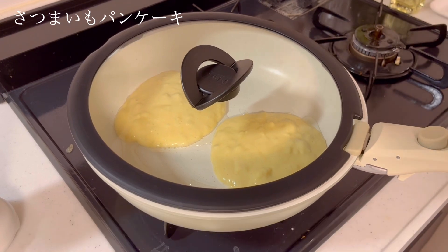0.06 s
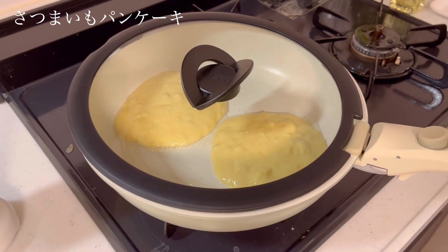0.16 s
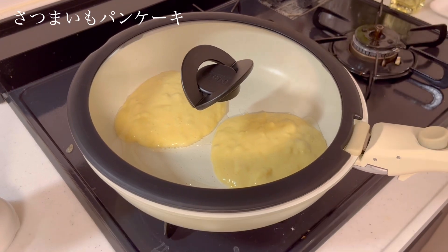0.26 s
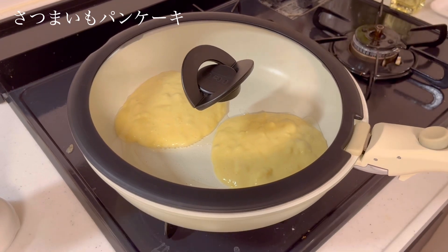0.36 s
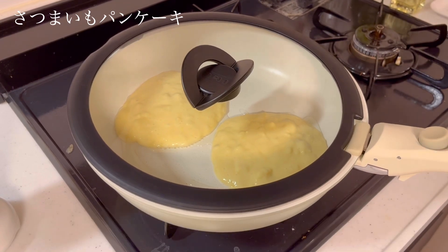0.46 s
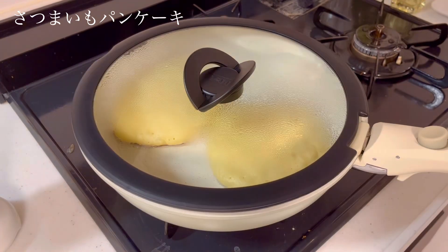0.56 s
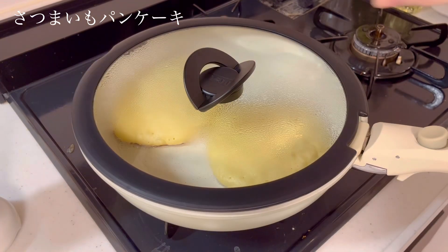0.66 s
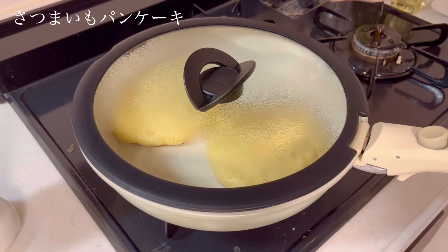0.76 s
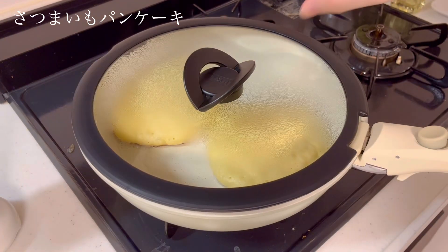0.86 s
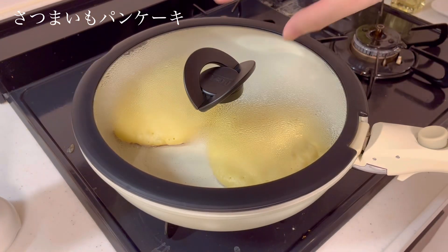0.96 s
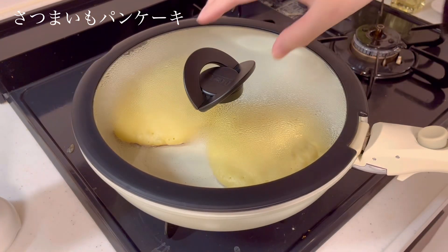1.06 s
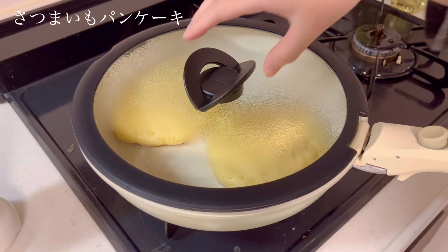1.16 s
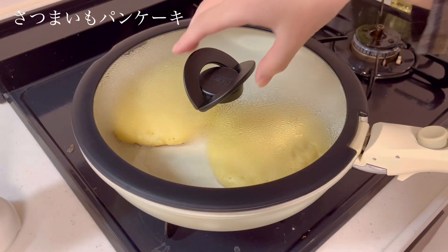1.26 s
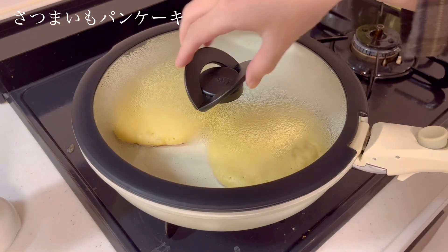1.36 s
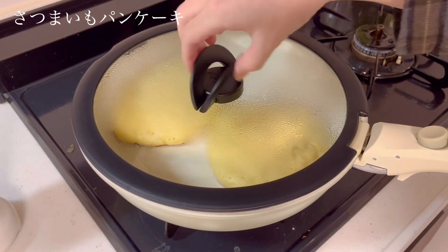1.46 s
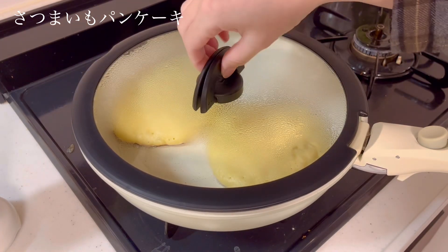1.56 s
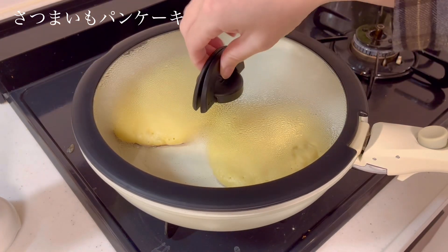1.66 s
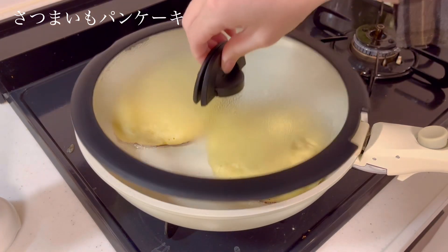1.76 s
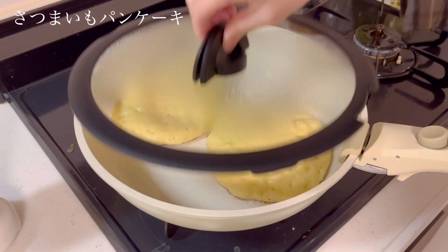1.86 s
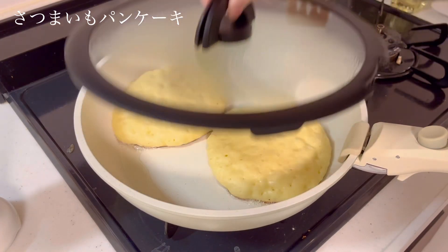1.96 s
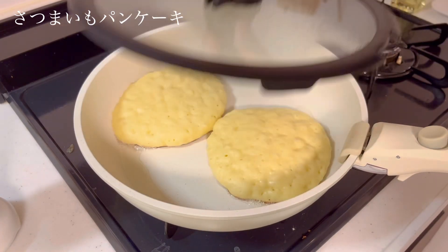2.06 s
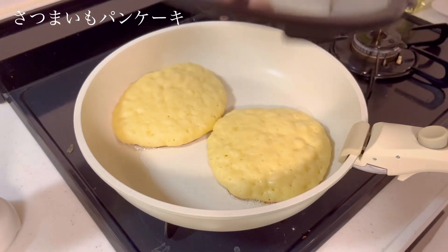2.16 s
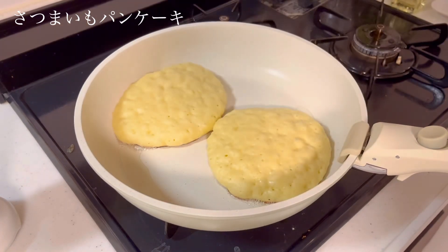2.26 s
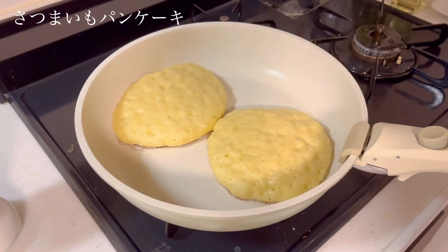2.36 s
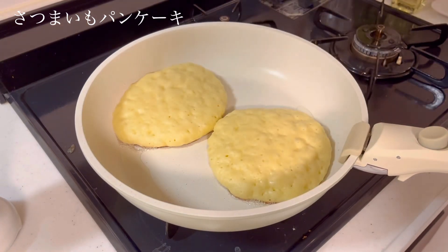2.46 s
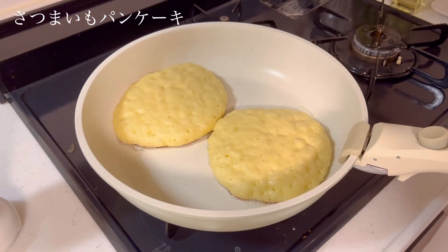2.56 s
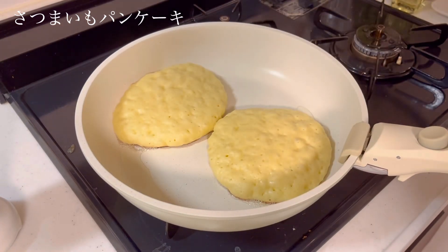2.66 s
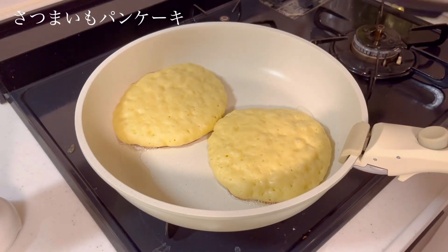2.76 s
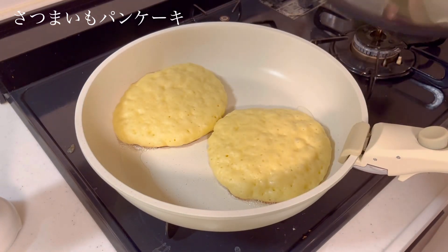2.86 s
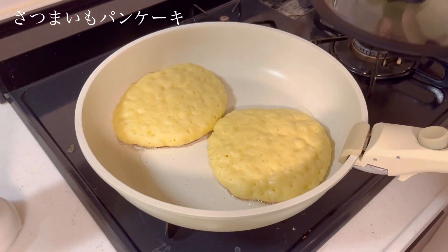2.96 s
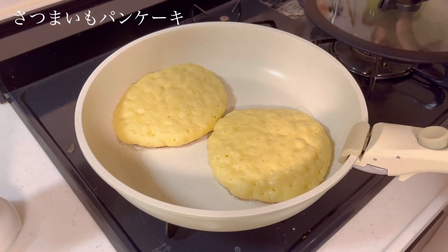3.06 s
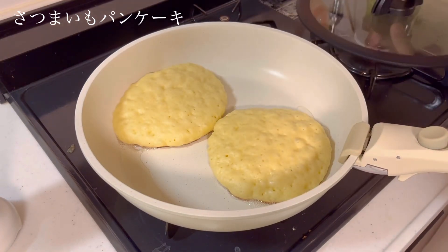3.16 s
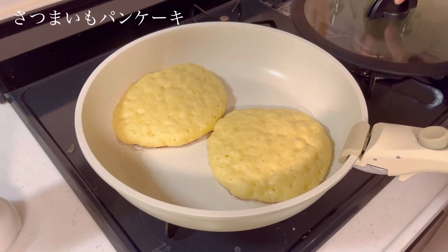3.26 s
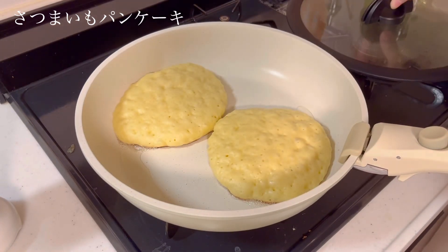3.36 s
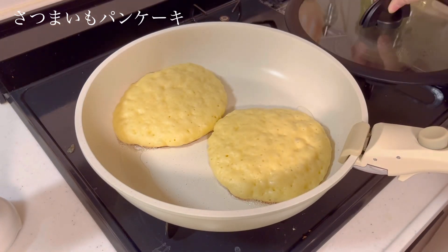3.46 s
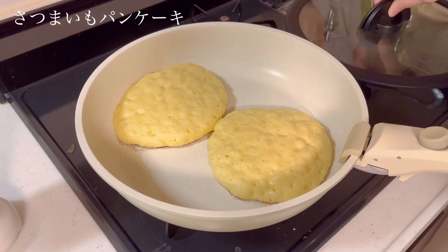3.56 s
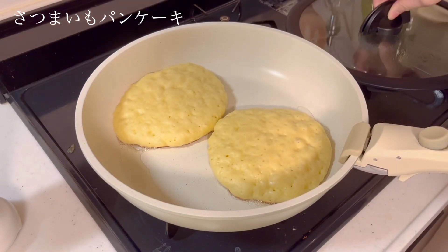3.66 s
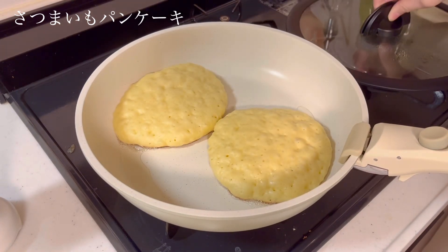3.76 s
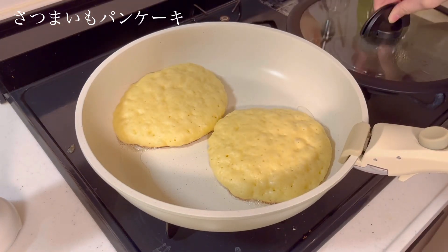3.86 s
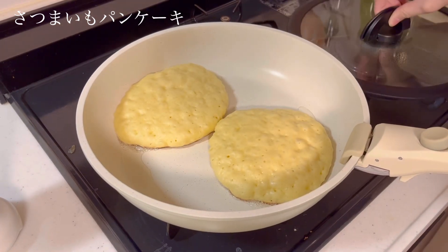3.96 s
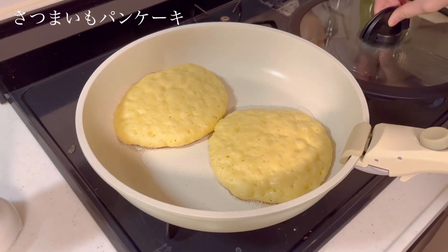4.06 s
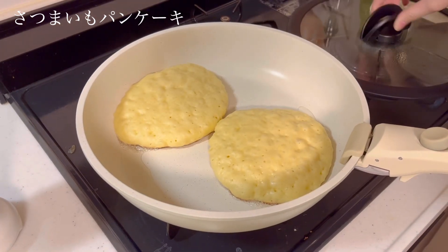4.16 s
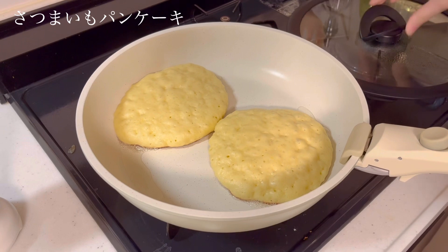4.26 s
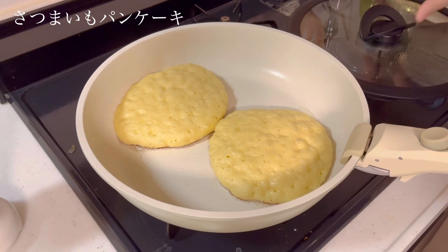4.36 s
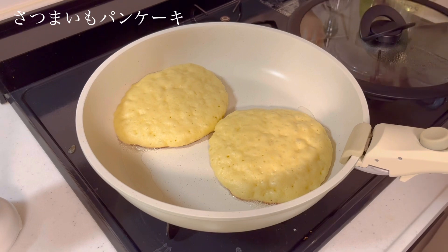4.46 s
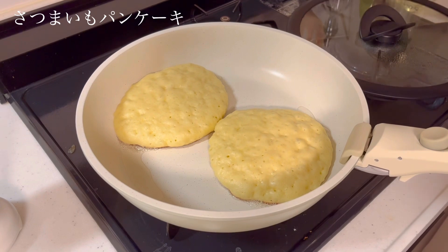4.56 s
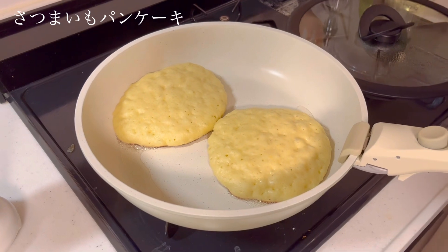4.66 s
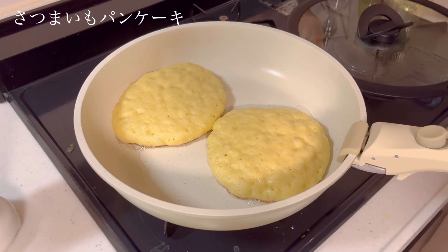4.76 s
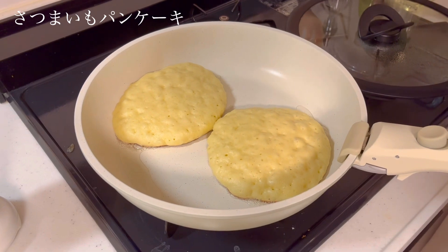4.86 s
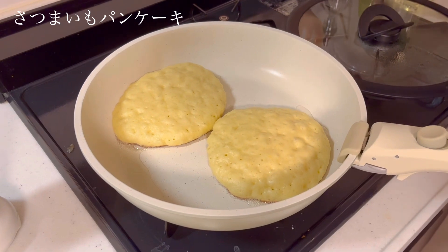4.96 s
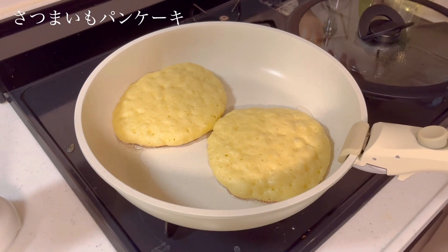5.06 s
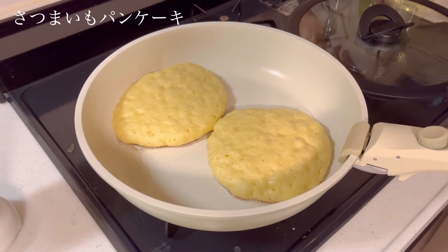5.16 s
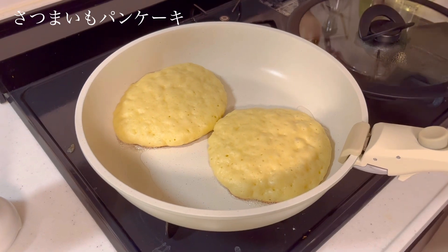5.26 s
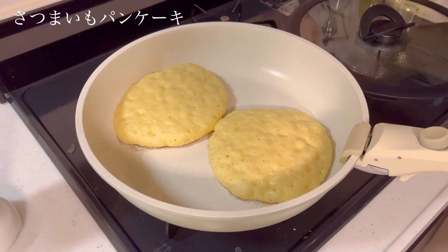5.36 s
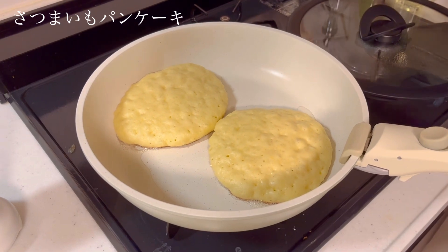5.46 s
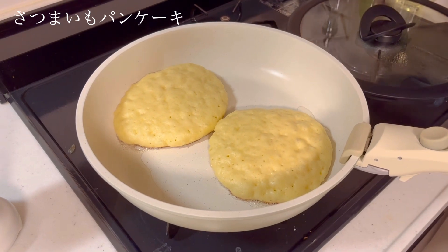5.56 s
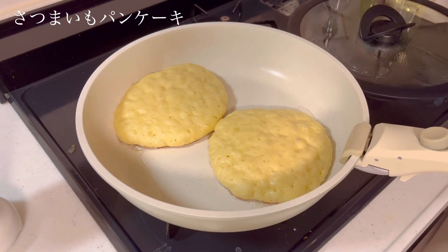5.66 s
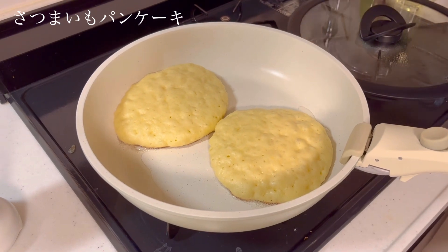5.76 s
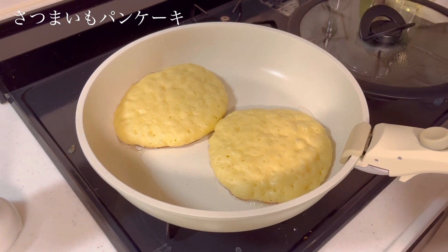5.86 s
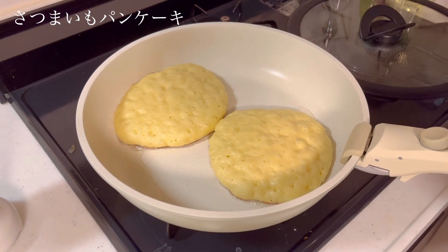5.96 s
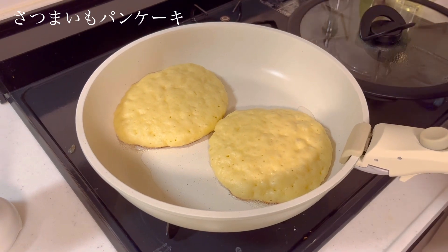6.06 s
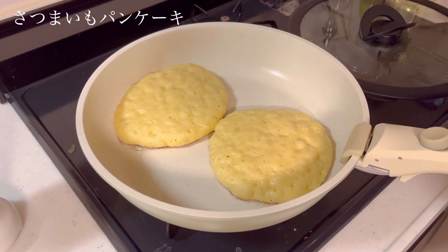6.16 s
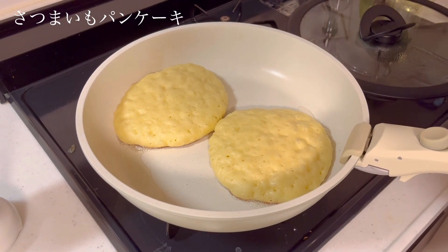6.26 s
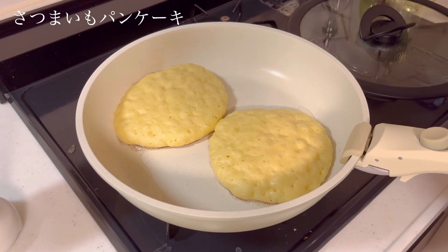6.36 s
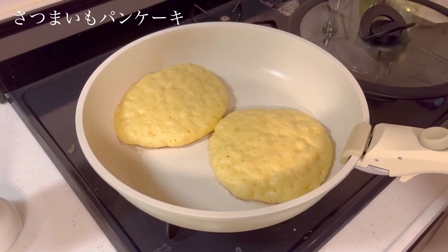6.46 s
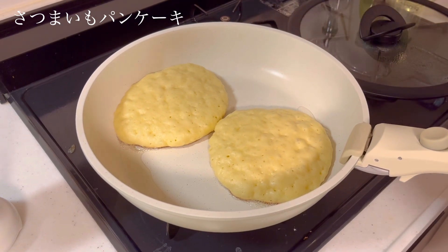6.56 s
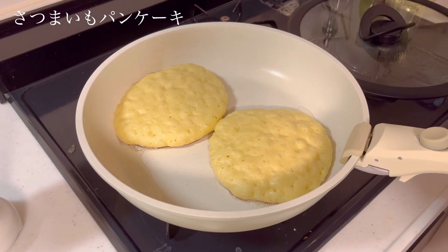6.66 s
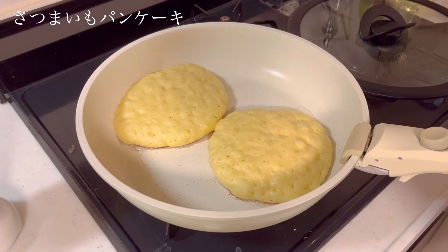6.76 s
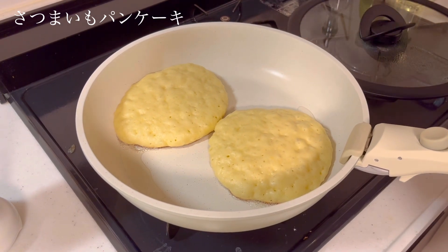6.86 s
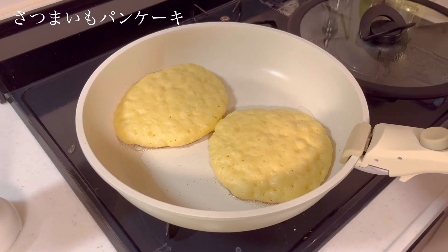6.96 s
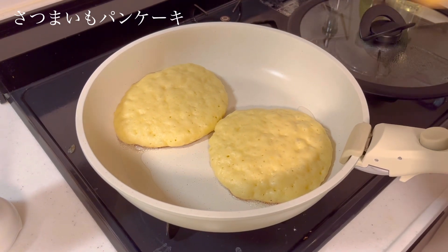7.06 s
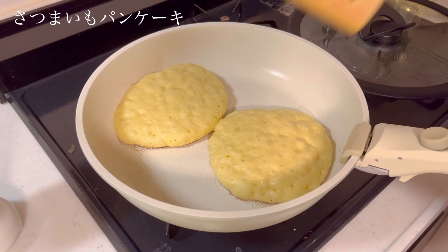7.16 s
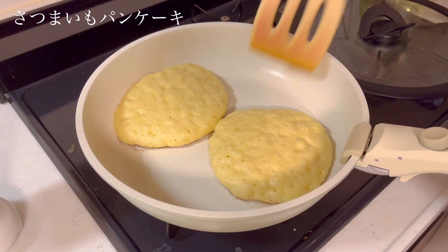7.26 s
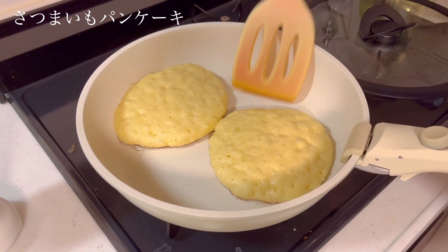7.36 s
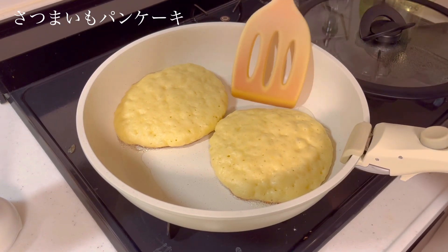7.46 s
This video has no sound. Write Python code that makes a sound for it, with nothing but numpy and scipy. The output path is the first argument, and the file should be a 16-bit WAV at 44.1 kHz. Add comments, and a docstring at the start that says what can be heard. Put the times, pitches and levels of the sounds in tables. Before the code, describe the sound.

Close stereo pickup at a stove: fine, quiet frying crackle over a soft low roar, very hushed at first. A small sharp knob click, then the sizzle brightens as the lid comes off. Padded thumps, a few hard taps, then a heavy rapid clank of lid on metal grate with a boom, fading thuds and a handle clack. Later a drawer rumbles and rattles, and a spatula knocks dully.

```python
"""Small kitchen: two pancakes sizzle in a pan over a gas burner, hushed for the first half second.
The knob of a glass lid snaps upright, the lid lifts and the sizzle opens up; its padded rim bumps the stove.
Set down on the next grate, the lid rocks to rest and its handle drops back; then a drawer rolls, utensils
knock and a spatula is picked up. Contacts are ringing modes with noise cracks, low knocks are booms with
panel noise, the sizzle is random ticks and crackles; burner, extractor and rustles are filtered noise."""
import sys
import numpy as np
from scipy import signal
from scipy.fft import rfft, irfft, next_fast_len
from scipy.io import wavfile
from scipy.ndimage import uniform_filter1d

SR = 44100
rng = np.random.default_rng(int(sys.argv[2]) if len(sys.argv) > 2 else 0)


def master_out(mix):
    """Clip the mix to full scale and print it as 16-bit PCM to the path in sys.argv[1]."""
    frames = np.transpose(np.atleast_2d(mix))
    ceiling = np.clip(frames, -1, 1)
    pcm = np.round(ceiling * 32767).astype(np.int16)
    wavfile.write(sys.argv[1], SR, pcm)


N = 331191


def amp(db):
    """Decibels to gain."""
    return 10 ** (np.asarray(db) / 20)


def evened(x):
    """Scales to rms 1."""
    return x / np.sqrt(np.mean(x ** 2) + 1e-24)


def read(points, hz):
    """Interpolates a table on a log-frequency axis."""
    f, value = np.transpose(points)
    return np.interp(np.log(hz + 1), np.log(f + 1), value)


def add(mix, s, sound):
    """Mixes a stereo sound in at time s."""
    part = mix[:, max(round(s * SR), 0):][:, :sound.shape[1]]
    part += sound[:, :part.shape[1]]


def shaped(x, gain):
    """Filters by a gain given as a function of frequency."""
    size = next_fast_len(x.shape[-1])
    spectrum = rfft(x, size) * gain(np.fft.rfftfreq(size, 1 / SR))
    return irfft(spectrum, size)[..., :x.shape[-1]]


def noise(gain, length=N):
    """Two unrelated channels of filtered noise."""
    return shaped(rng.standard_normal((2, length)), gain)


def band(hz, centre_hz, octaves):
    """Bell-shaped band on a log-frequency axis."""
    return np.exp(-.5 * (np.log2((hz + 1) / centre_hz) / octaves) ** 2)


def peaks(modes, hz):
    """Gain of a set of resonances, summed in power."""
    power = sum(amp(db) ** 2 / (1 + (2 * (hz - f) / width) ** 2) ** 2 for f, width, db in modes)
    return np.sqrt(power)


def wander(seconds):
    """Smooth random curve of rms 1."""
    width = max(round(seconds * SR), 2)
    smooth = uniform_filter1d(rng.standard_normal(N), width)
    return evened(uniform_filter1d(smooth, width))


# left-right likeness of the microphone pair: f/Hz, likeness [0-1]
LIKENESS = [(60, .99), (150, .96), (350, .8), (800, .25), (1450, .3), (1950, .88), (3000, .72), (7000, .66),
            (8300, .95), (10000, .75), (12000, .95), (13700, .6), (15200, .9)]
# phase lead of the left port: f/Hz, lead/rad
LEAD_RAD = [(100, 0), (1000, -.4), (1900, 0), (3100, .6), (4700, .2), (6500, -1.2), (8200, -3.1),
            (8900, -3.3), (11200, -6.2), (12900, -6.3), (14700, -9.4)]
# left-right level difference: f/Hz, L-R/dB
BALANCE_DB = [(50, 1), (200, 2.2), (700, 2.5), (1350, 0), (2400, 2), (3600, 4.2), (6000, 3), (8200, 0),
              (15000, 0)]


def ports(pair):
    """Mixes two unrelated signals into the likeness, phase and balance of two microphone ports."""
    same = lambda hz: np.clip(read(LIKENESS, hz), 0, 1)
    unlike = lambda hz: np.sqrt(1 - same(hz) ** 2)
    right = shaped(pair[0], same) + shaped(pair[1], unlike)
    side = lambda hz: amp(read(BALANCE_DB, hz) / 2) * np.exp(.5j * read(LEAD_RAD, hz))
    return np.array([shaped(pair[0], side), shaped(right, lambda hz: 1 / side(hz))])


# reverberation time of the kitchen: f/Hz, t60/s
KITCHEN_T60_S = [(80, 0.83), (300, 0.38), (1000, 0.27), (3000, 0.21), (6000, 0.26), (13000, 0.28)]


def kitchen(x, onset_s):
    """Dense reflections, each band dying at its own speed."""
    hz, t, z = signal.stft(rng.standard_normal((2, SR)), SR, nperseg=256)
    decay = amp(-60 * t / read(KITCHEN_T60_S, hz)[:, None])
    tail = signal.istft(z * decay, SR, nperseg=256)[1]
    onset = 1 - np.exp(-np.arange(tail.shape[1]) / SR / onset_s)
    tail = ports(tail * onset)
    return signal.fftconvolve(x[:1], tail / np.linalg.norm(tail[0]), axes=1)[:, :N]


ROAR_DB = -57.5
# burner and extractor spectrum: f/Hz, relative density/dB per Hz
ROAR_COLOUR = [(20, -19.5), (45, -1), (75, -2), (105, -1.5), (150, -14), (210, -10.5), (330, -16),
               (480, -20), (630, -24.5), (850, -39.5), (1220, -34), (1500, -49.5), (2000, -48.5),
               (2600, -54), (16000, -98)]
# wavering drones: f/Hz, width/Hz, level/dB
DRONES = [(64.85, 6.1, -62), (93, 3.9, -72), (199, 20, -71)]


def burner():
    """Broad low noise of flame and extractor, plus narrow noise bands that waver as drones."""
    sound = amp(ROAR_DB) * evened(noise(lambda hz: amp(read(ROAR_COLOUR, hz))))
    for mode in DRONES:
        sound += amp(mode[2]) * evened(noise(lambda hz: peaks([mode], hz)))
    return ports(sound)


# brief crackles in the sizzle: t/s, level/dB before POP_GAIN_DB, centre f/Hz
POPS = [(2.097, -25, 6000), (2.182, -30.5, 4260), (2.352, -29, 1790), (2.411, -32, 4200),
        (2.468, -36, 4200), (2.713, -29.5, 4200), (3.049, -32.5, 4350), (3.189, -41, 4200),
        (3.249, -32, 4030), (3.288, -29, 4400), (3.313, -31, 3800), (4.397, -32, 10000), (4.688, -26, 3340),
        (4.813, -29, 3170), (5.831, -28, 7000), (5.838, -31, 8000), (5.852, -26, 10100),
        (6.035, -28, 11300), (6.140, -39, 3500), (6.262, -30, 4200), (6.287, -28, 6050), (6.385, -29, 8500),
        (6.398, -26, 12040), (6.521, -31, 4000), (6.794, -34, 4200), (7.094, -32, 5500), (7.109, -29, 6000),
        (7.210, -31, 4100)]
# lesser crackles: random times, levels and centre frequencies
CRACKLES_PER_S, CRACKLE_DB, CRACKLE_LOW_HZ, CRACKLE_HIGH_HZ = 28, -38.5, 3000, 7000
POP_GAIN_DB = -8  # on all crackles


def pops(burst_s, octaves, count):
    """Single crackles: decaying noise bursts, each with its own level and centre frequency."""
    out, t = np.zeros((2, N)), np.arange(256) / SR
    lead = 64  # samples of room for the filter's pre-ring
    lesser = []
    for when, size, pitch, chance in rng.random((count, 4)):
        if chance < CRACKLES_PER_S * N / SR / count:
            level_db = CRACKLE_DB + 10 * np.log10(0.13 + size)
            centre_hz = CRACKLE_LOW_HZ * (CRACKLE_HIGH_HZ / CRACKLE_LOW_HZ) ** pitch
            lesser.append((when * N / SR, level_db, centre_hz))
    for s, db, centre_hz in POPS + lesser:
        spray = rng.standard_normal((2, len(t))) * np.exp(-t / burst_s)
        burst = np.pad(spray, ((0, 0), (lead, 0)))
        burst = shaped(burst, lambda hz: band(hz, centre_hz, octaves))
        burst /= np.linalg.norm(burst, axis=1, keepdims=True)
        add(out, s - lead / SR, amp(db + POP_GAIN_DB) * burst)
    return out


LIFT_START_S, LIFT_LENGTH_S = 1.62, 0.33
# gain through the closed lid: f/Hz, gain/dB
LID_LOSS = [(800, -2), (1400, -12), (1900, -8.5), (2900, -11.5), (4000, -10), (5600, -14.5), (7500, -13.5),
            (11000, -10)]


def past_lid(x):
    """The closed lid muffles the pan; a crossfade to the open sound follows its lift."""
    opening = np.clip((np.arange(N) / SR - LIFT_START_S) / LIFT_LENGTH_S, 0, 1)
    return opening * x + (1 - opening) * shaped(x, lambda hz: amp(read(LID_LOSS, hz)))


SIZZLE_DB = -63  # rms of the fine ticks before wall, colour and lid
# sizzle filter: f/Hz, relative gain/dB
SIZZLE_COLOUR = [(300, -14), (800, -2.5), (1400, -5.5), (1850, -3), (2400, -7), (3200, -2.5), (5000, -4),
                 (7000, -1), (9000, 0), (11000, -0.5), (14000, -2.5), (15500, -14)]


def sizzle(ticks_per_s, spread_db, hiss_db, flicker_db, splash_db, splash_s, octaves, clump_db, drift_db, count):
    """Tiny steam bubbles of many sizes tick under the batter; short pan-wall reflections smear them."""
    ticks = np.zeros((2, N))
    for centre_hz in np.geomspace(1500, 14000, count):
        sizes = amp(spread_db * np.minimum(rng.exponential(1, N), 4.5))
        sizes *= rng.random(N) < ticks_per_s / count / SR
        signed = sizes * rng.choice([-1, 1], (2, N))
        ticks += shaped(signed, lambda hz: band(hz, centre_hz, octaves))
    ticks *= amp(clump_db * wander(0.025))  # tick level swells and dips
    hissing = evened(ticks) + amp(hiss_db) * rng.standard_normal((2, N))
    bursts = evened(hissing * amp(flicker_db * wander(0.027)))
    bursts = bursts * amp(SIZZLE_DB + drift_db * wander(0.29))
    bursts += pops(burst_s=0.00061, octaves=0.65, count=400)
    t = np.arange(400) / SR
    wall = rng.standard_normal((2, len(t))) * np.exp(-t / splash_s)
    wall *= amp(splash_db) / np.linalg.norm(wall, axis=1, keepdims=True)
    splash = signal.oaconvolve(bursts, wall, axes=1)[:, :N]
    scattered = rng.choice([-1, 1], N) * splash  # random sign per sample roughens the splash into noise
    coloured = shaped(bursts + scattered, lambda hz: amp(read(SIZZLE_COLOUR, hz) + 3.5))
    return ports(past_lid(coloured))


# handling rustles: t/s, level/dB before gain, half length/s, centre f/Hz
RUSTLES = [(0.07, -88.5, 0.11, 3230), (0.2, -83.5, 0.034, 480), (0.866, -80.5, 0.016, 1510),
           (4.894, -71.5, 0.075, 1990), (5.12, -71.5, 0.03, 380), (5.325, -67, 0.044, 477),
           (6.16, -73, 0.01, 1050)]


def rustles(gain_db, octaves):
    """Brief bell-shaped swells of soft friction noise."""
    t, swells = np.arange(N) / SR, np.zeros((2, N))
    for s, db, half_s, centre_hz in RUSTLES:
        swell = np.exp(-.5 * ((t - s) / half_s) ** 2)
        swells += amp(db) * swell * evened(noise(lambda hz: band(hz, centre_hz, octaves)))
    return amp(gain_db) * ports(swells)


ROCK_START_S, ROCK_PERIOD_S = 4.04, 0.22
ROCK_DB, ROCK_LOSS_DB, ROCK_HOLLOW_DB, ROCK_HZ = -26, -4, -30.5, 63.8  # loss is per swing


def rocking(count):
    """Swings of the lid on the grate thump the stove top at even intervals, each weaker."""
    return [(ROCK_START_S + k * ROCK_PERIOD_S, ROCK_DB + k * ROCK_LOSS_DB, ROCK_HOLLOW_DB, ROCK_HZ, 1)
            for k in range(count)]


# dull bumps of stove, floor and cabinet:
# t/s, level/dB before boom and knock gains, hollow knock/dB relative, boom f/Hz, ring length factor
BUMPS = [(0.185, -60.5, 0, 331, 0.97), (0.877, -40.5, -6, 96.5, 0.94), (1.702, -33.5, -12, 90, 0.92),
         (2.820, -33.5, -17, 100, 0.85), (2.862, -32, -15, 112, 0.73), (3.926, -29.5, -12.5, 179, 1.1),
         (3.946, -20, -19, 107.7, 1.0), (3.951, -23.5, -14.5, 190, 1.2), (5.112, -36, -13, 102, 1.06),
         (5.182, -34, -11, 201, 1.1), (5.241, -34, -11, 240, 0.48), (5.362, -26, -17, 361, 0.84),
         (5.452, -31, -12.5, 110.4, 1.1), (5.542, -36.5, -17, 110.4, 0.75),
         (7.278, -32.5, -17.5, 217.5, 1.12), (7.366, -29.5, -12.5, 92, 0.97),
         (7.444, -29, -16.5, 105, 0.56)]


def bumps(boom_db, boom_s, knock_db, knock_s, rise_s):
    """Soft blows: a dying low sine, and a hollow noise knock from the panels."""
    out, t = np.zeros((2, N)), np.arange(16384) / SR
    # f/Hz, gain/dB
    panel = [(40, -9.5), (100, 16.0), (300, 13.5), (550, 7.5),
             (850, -13.5), (1300, -17.0), (2500, -40.0), (6000, -48)]
    for s, db, hollow_db, hz, length in BUMPS + rocking(count=5):
        boom = np.sin(2 * np.pi * hz * t) * np.exp(-t / (boom_s * length))
        knock = evened(ports(noise(lambda f: amp(read(panel, f)), len(t))))
        knock = knock * np.exp(-t / (knock_s * length))
        thud = amp(boom_db) * boom + amp(knock_db + hollow_db) * knock
        add(out, s, amp(db) * thud * (1 - np.exp(-t / rise_s)))
    return out


ROLL_START_S, ROLL_END_S, COAST_DB = 5.2, 5.66, -56.5
# pushes on the drawer: t of top speed/s, level/dB, speeding-up/s, braking/s
PUSHES = [(5.46, -51, 0.059, 0.089), (5.635, -42.5, 0.029, 0.015)]


def drawer_speed(stop_s):
    """Roller loudness: slow coasting, and a swell for every push."""
    t = np.arange(N) / SR
    level = amp(COAST_DB) * (t > ROLL_START_S) * np.exp(-np.maximum(t - ROLL_END_S, 0) / stop_s)
    for s, db, up_s, down_s in PUSHES:
        level += amp(db) * np.exp(-.5 * ((t - s) / np.where(t < s, up_s, down_s)) ** 2)
    return level


# rattle filter: f/Hz, relative density/dB per Hz before resonances
SLIDE_COLOUR = [(88, -45), (150, -13.5), (459, -3), (700, -3), (825, -5.5), (1050, -9), (6200, -18),
                (8020, -35), (9460, -15), (12000, -29), (15600, -61), (22000, -120)]
# drawer on its runners: f/Hz, width/Hz, level/dB before mode_db
RUNNERS = [(330, 71, -5), (622, 59, -2.5), (700, 70, -4.5), (1062, 100, 0.5), (1266, 81, -4),
           (1505, 81, -5), (1836, 59, -0.5), (2120, 60, -6), (2550, 55, -5), (3000, 490, -11),
           (4450, 60, -17), (6100, 97, -13)]


def slide(bumps_per_s, smooth_db, mode_db, rumble_db, rumble_hz, octaves):
    """Rollers rattle along their runners and shake the drawer; the cabinet rumbles while it travels."""
    roughness = (rng.random(N) < bumps_per_s / SR) + amp(smooth_db)
    rattle = rng.standard_normal((2, N)) * roughness
    resonance = lambda hz: 1 + amp(mode_db) * peaks(RUNNERS, hz)
    box = shaped(rattle, lambda hz: amp(read(SLIDE_COLOUR, hz)) * resonance(hz))
    cabinet = evened(shaped(rattle, lambda hz: band(hz, rumble_hz, octaves)))
    travel = np.clip((np.arange(N) / SR - ROLL_START_S) / (ROLL_END_S - ROLL_START_S), 0, 1)
    rumble = amp(rumble_db) * ports(cabinet) * np.sqrt(travel * (1 - travel))
    return evened(ports(box)) * drawer_speed(stop_s=0.011) + rumble


def ring(modes, t):
    """Dying sines, a quarter turn apart on the two paths to the microphone."""
    quarter, out = np.array([[0], [np.pi / 2]]), 0
    for hz, width, db in modes:
        phase = 2 * np.pi * (hz * t + rng.random()) + quarter
        out = out + amp(db) * np.exp(-np.pi * abs(width) * t) * np.sin(phase)
    return out


# contact bands, body/reference/clack/edge/fizz: low f/Hz, high f/Hz
BAND_EDGES = [(150, 700), (700, 1500), (1500, 3000), (3000, 7500), (9000, 15000)]


# All blow tables: t/s, reference-band level/dB before gain, then body, clack, edge, fizz/dB relative,
# ring length factor, f favoured by the spot struck/Hz.
# All blow modes: f/Hz, width/Hz before damping and length, relative level/dB.
def blows(rows, modes, gain_db, crack_db, crack_s, damping, rise_s, left_db, spot_db):
    """Blows ring modes and a dense crack; spot favours modes, contact hardness weights five bands."""
    out, t = np.zeros((2, N)), np.arange(8000) / SR
    lead, head = 192, 1024  # samples: filter pre-ring, level window
    hz = np.fft.rfftfreq(head, 1 / SR)
    for s, db, body_db, clack_db, edge_db, fizz_db, length, spot_hz in rows:
        struck = [(f, width, level + spot_db * band(f, spot_hz, octaves=0.12)) for f, width, level in modes]
        # short-lived modes crowd around the strong ones
        clusters = [(f, 0.42 * f, level) for f, width, level in struck]
        # a firm contact shortens the ring
        held = [(f, (width + damping / np.pi) / length, level) for f, width, level in struck]
        tone = evened(ring(held, t))
        crowd = noise(lambda f: 0.18 + peaks(clusters, f), len(t))
        crack = evened(crowd * np.exp(-t / (crack_s * length)))
        pressing = 1 - np.exp(-(t / rise_s) ** 2)  # the contact force takes a moment to build
        hit = pressing * (tone + amp(crack_db) * crack)
        hit = ports(np.pad(hit, ((0, 0), (lead, 0))))
        power = 2 * abs(rfft(hit.mean(0)[:head]) / head) ** 2
        natural_db = [10 * np.log10(power[(hz > lo) & (hz < hi)].sum()) for lo, hi in BAND_EDGES]
        lift_db = np.array([body_db, 0, clack_db, edge_db, fizz_db]) - natural_db
        contact = []
        for (lo, hi), lift in zip(BAND_EDGES, lift_db):
            contact += [(lo * 1.2, lift), (hi / 1.2, lift)]
        hit = shaped(hit, lambda f: amp(read(contact, f)))
        add(out, s - lead / SR, amp(db + gain_db) * hit)
    return out * amp([[left_db / 2], [-left_db / 2]])


# utensils and drawer, blow columns
DRAWER_KNOCKS = [(5.078, -58.5, 14.5, 0, 6.5, 7, 0.94, 611), (5.178, -34, -3.5, 1, 3.5, -1.5, 0.65, 2000),
                 (5.186, -33, 6, -4, -4, -24, 1.1, 430), (5.286, -43, 8, -2, -2, -31, 0.93, 821),
                 (5.336, -51.5, 15, 5, -8, -18, 0.54, 611), (5.354, -42.5, -4, -1.5, 2, 6, 0.66, 2180),
                 (5.362, -42.5, 11, -6, -5, -14, 1.3, 390), (5.396, -39, 2, 4, 6.5, -26, 0.99, 2980),
                 (5.425, -37, -5, -5, -5, -16, 1.1, 2964), (5.444, -24.5, -6, -9.5, -15, -30, 0.75, 1240),
                 (5.454, -37.5, 7.5, -15, -21, -32, 1.8, 611), (5.484, -33, 0, -0.5, -11, -32, 0.86, 330),
                 (5.512, -40, -1, 1.5, 0, -6, 1.2, 1846), (5.526, -44.5, 5.5, -4, -3, -19, 0.93, 611)]
# drawer resonances, mode columns
DRAWER = [(324, 30, 2.5), (380, 53, 2), (431, 42, 5.5), (609, 28, 3.5), (708, 33, 2), (827, 22, -2.5),
          (1142, 26, -5), (1261, 24, -3), (1876, 26, -9), (1967, 17, -5), (2180, 50, -10), (2820, 32, -6),
          (2964, 26, -5.5), (3560, 29, -4), (4290, 22, -4.5), (4830, 69, -9), (6220, 45, -9)]


def drawer_knocks():
    """Utensils knock about and ring the drawer."""
    return blows(DRAWER_KNOCKS, DRAWER, gain_db=-11.0, crack_db=0.5, crack_s=0.012, damping=20,
                 rise_s=0.00064, left_db=0.0, spot_db=6.5)


# spatula contacts, blow columns
SPATULA_KNOCKS = [(7.294, -42.5, -12, -11.5, -16, -9, 1.6, 1050),
                  (7.360, -28, -6.5, -17, -14, -23, 0.29, 920), (7.371, -37, 4, -12, -17, -11, 1, 1250),
                  (7.436, -27, -12, -3, -1, -17, 0.87, 3150), (7.476, -45, -10, -2, -12, -13, 1.4, 1250)]
# spatula resonances, mode columns
SPATULA = [(470, 78, -12), (595, 140, -12), (910, 110, -6), (1035, 150, 5), (1236, 100, 6), (1820, 130, -1),
           (2083, 99, -4), (3114, 43, -1.5), (4420, 98, -9), (5130, 45, -6), (6140, 65, -9)]


def spatula_knocks():
    """The spatula knocks as it is picked up, its broad modes strongly damped."""
    return blows(SPATULA_KNOCKS, SPATULA, gain_db=-15.0, crack_db=-6.5, crack_s=0.014, damping=110,
                 rise_s=0.00093, left_db=1.5, spot_db=5)


# knob contacts, blow columns
KNOB_CLICKS = [(1.358, -55, 5.5, -5.5, -5, -28, 1.8, 1257), (1.429, -50, -2, 2.5, -7.5, -26, 1.9, 1480),
               (1.495, -55.5, 0, -3, 0, -15, 1.5, 1480), (1.507, -39, -4, 8.5, 16.5, 17, 0.82, 5640)]
# knob resonances, mode columns
KNOB = [(1257, 6.8, -2), (1480, 33, -15), (2130, 70, 9.5), (2430, 90, -1), (3430, 140, 1), (3990, 120, 1.5),
        (5610, 36, -8), (6070, 160, -7), (10040, 110, 10), (11400, 220, 9), (12100, 170, -2),
        (14900, 140, 11)]


def knob_clicks():
    """The folding knob snaps upright: short clicks on damped modes."""
    return blows(KNOB_CLICKS, KNOB, gain_db=-14.0, crack_db=6.5, crack_s=0.005, damping=88,
                 rise_s=0.00059, left_db=0.8, spot_db=10)


# padded rim on stove, blow columns
SOFT_KNOCKS = [(2.814, -55.5, 21.5, -21, -26, -30, 1, 433), (2.855, -59, 23, -15, -22, -30, 1, 420),
               (2.925, -58, 21.5, -17, -22, -30, 1, 490), (2.934, -56.5, 22, -15, -22, -30, 0.8, 280),
               (2.957, -59.5, 22.1, -17, -22, -30, 1, 570)]
# padded rim resonances, mode columns
PADDED_RIM = [(280, 19, 7), (435, 31, -0.5), (491, 17, -4), (564, 25, -5.5), (635, 37, -17.5),
              (750, 16, -14), (1110, 30, -24)]


def padded_knocks():
    """The padded rim bumps the stove: low modes, little treble."""
    return blows(SOFT_KNOCKS, PADDED_RIM, gain_db=-11.5, crack_db=-4.5, crack_s=0.012, damping=25,
                 rise_s=0.00091, left_db=-0.5, spot_db=7.5)


# rim contacts, blow columns
RIM_TAPS = [(1.702, -58.5, 3, -8.5, -20, -25, 1.4, 1170), (3.647, -41.5, -13.5, 3.5, -5.5, -18, 0.99, 2515),
            (3.785, -30.5, -17, 1, -1, -15, 0.73, 2135), (3.788, -31.5, -15.5, 0, -3, -17, 0.54, 1170),
            (3.792, -36.5, -16, -3.5, -15, -17.5, 1.4, 1077)]
# rim resonances, mode columns
RIM = [(659, 86, -20.5), (910, 53, -8), (1070, 24, -7.5), (1180, 96, 1), (1747, 25, -7), (1935, 62, -7.5),
       (2120, 45, -1.5), (2490, 35, -5.5), (3440, 69, -5), (3820, 75, -2), (4970, 50, -3), (4917, 13, -5.5),
       (5140, 12, -17.5), (5880, 30, -17), (9900, 86, -19), (10200, 39, -20.5)]


def rim_taps():
    """Taps ring the modes of the lid rim."""
    return blows(RIM_TAPS, RIM, gain_db=-9.0, crack_db=-5.5, crack_s=0.017, damping=41,
                 rise_s=0.00076, left_db=0.5, spot_db=2)


# handle contacts, blow columns
HANDLE_CLACKS = [(4.228, -66.5, 1, 3, 7, -11, 0.95, 2120), (4.241, -41.5, -18, -8, -13.5, -30, 0.84, 1270)]
# handle resonances, mode columns
HANDLE = [(1140, 87, -5), (1280, 53, 1), (1415, 49, 0), (1700, 25, -5), (2140, 60, -2), (2570, 40, -10),
          (3550, 54, -8), (4890, 70, -13)]


def handle_clacks():
    """The handle drops back: clacks with a slower contact rise."""
    return blows(HANDLE_CLACKS, HANDLE, gain_db=-7.0, crack_db=-2.0, crack_s=0.017, damping=30,
                 rise_s=0.0017, left_db=-1.5, spot_db=1.5)


# lid on grate, blow columns
LID_BLOWS = [(3.909, -40, 1, -10.5, -18, -30.5, 0.7, 1340), (3.919, -25.5, -3.5, 2, -5, -30.5, 0.71, 1590),
             (3.931, -17, -10.5, -2.5, 0, -25.5, 0.61, 1330),
             (3.939, -19, -11.5, -5.5, -4, -13.5, 0.62, 1168), (3.947, -26, 0, -5, -8.5, -30, 0.61, 2570),
             (3.956, -29.5, -2.5, -8, -4, -24.5, 0.91, 1150), (3.967, -26, -5, -0.5, -2.5, -25, 0.64, 2680),
             (3.980, -33, 1, -11, -18, -28, 0.81, 1320), (3.998, -39, -6, 3.5, -7, -31, 1, 1213),
             (4.052, -50, -9, 2, 8, -10, 0.95, 4250)]
# lid resonances, mode columns
LID = [(527, 32, -11), (760, 24, -2.5), (1180, 29, -4), (1200, 30, -8), (1312, 17, -3.5), (1406, 21, -4),
       (1600, 28, -1), (2190, 45, 4), (2460, 32, -1.5), (2540, 30, 0), (2690, 29, 1.5), (2906, 38, -2.5),
       (3070, 42, -8), (3315, 42, 4), (3470, 26, -3), (3830, 30, -10), (4130, 45, -1.5), (4580, 38, -10.5),
       (4720, 35, -15), (5070, 45, -13), (6600, 70, -2.5), (6670, 35, -15.5)]


def lid_blows():
    """A rapid run of blows rings the lid as it is set down."""
    return blows(LID_BLOWS, LID, gain_db=-12.5, crack_db=0.5, crack_s=0.01, damping=43,
                 rise_s=0.00068, left_db=-1.3, spot_db=5)


# stove top and grate under the lid: f/Hz, width/Hz, level/dB
GRATE = [(62, 3.2, -35.5), (112, 20, -32.5), (162, 22, -30), (197.3, 6.2, -32), (302.5, 7.3, -35),
         (604, 17, -36), (756, 6.7, -46), (1170, 7, -37), (1352, 8, -39), (1470, 14, -39.5),
         (1690, 17, -31), (3452, 12, -42)]


def grate(gain_db, rise_s, shimmer_db, shimmer_hz, shimmer_s, octaves):
    """From the lid's heaviest blow the stove top booms and the many like bars shimmer on."""
    out, t = np.zeros((2, N)), np.arange(2 * SR) / SR
    bars = evened(noise(lambda hz: band(hz, shimmer_hz, octaves), len(t)))
    shimmer = amp(shimmer_db) * bars * np.exp(-t / shimmer_s)
    sound = amp(gain_db) * ring(GRATE, t) + shimmer
    heaviest = max(LID_BLOWS, key=lambda row: row[1])
    add(out, heaviest[0], ports(sound * (1 - np.exp(-t / rise_s))))
    return out


def radiated(x, corner_hz):
    """Thin panels give off little of their deepest motion: third-order high-pass magnitude."""
    return shaped(x, lambda hz: (hz / corner_hz) ** 3 / np.sqrt(1 + (hz / corner_hz) ** 6))


HUSH_ENDS_S, HUSH_SIZZLE_DB, HUSH_ROAR_DB = 0.507, -8.5, -13


def scene():
    """Handling sounds and their room, over the pan and the burner."""
    pan = sizzle(ticks_per_s=1800, spread_db=4.2, hiss_db=1.5, flicker_db=0.62, splash_db=-8.0,
                 splash_s=0.0014, octaves=0.62, clump_db=0.84, drift_db=0.02, count=8)
    hushed = np.arange(N) < HUSH_ENDS_S * SR
    steady = pan * amp(HUSH_SIZZLE_DB * hushed) + burner() * amp(HUSH_ROAR_DB * hushed)
    friction = rustles(gain_db=9.5, octaves=1.0)
    thuds = bumps(boom_db=-5.5, boom_s=0.021, knock_db=-1.0, knock_s=0.032, rise_s=0.003)
    drawer = drawer_knocks() + slide(bumps_per_s=650, smooth_db=-11.5, mode_db=18.0,
                                     rumble_db=-48, rumble_hz=91.5, octaves=0.89)
    spatula, knob, padded = spatula_knocks(), knob_clicks(), padded_knocks()
    rim, handle, lid = rim_taps(), handle_clacks(), lid_blows()
    stove = grate(gain_db=0.0, rise_s=0.00462, shimmer_db=-57.0, shimmer_hz=980, shimmer_s=0.33, octaves=0.21)
    sends = amp(-14.5) * knob + amp(-8.5) * (rim + handle + lid)
    sends += amp(-11) * drawer + amp(-15.0) * spatula + amp(-10) * (thuds + padded)
    room = kitchen(sends, onset_s=0.0032)
    handling = knob + padded + rim + handle + drawer + spatula
    panels = radiated(lid + thuds + stove + room, corner_hz=52)
    return handling + panels + friction + steady


EDGE_HZ = 15700


def record(dry):
    """Linear-phase low-pass: nothing sounds above EDGE_HZ."""
    lowpass = signal.firwin(255, EDGE_HZ, window=("kaiser", 8), fs=SR)
    return signal.oaconvolve(dry, lowpass[None], "same")


dry = scene()
out = record(dry)
master_out(out)
```